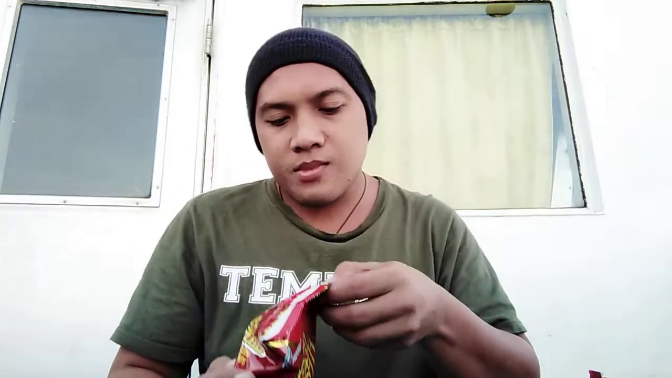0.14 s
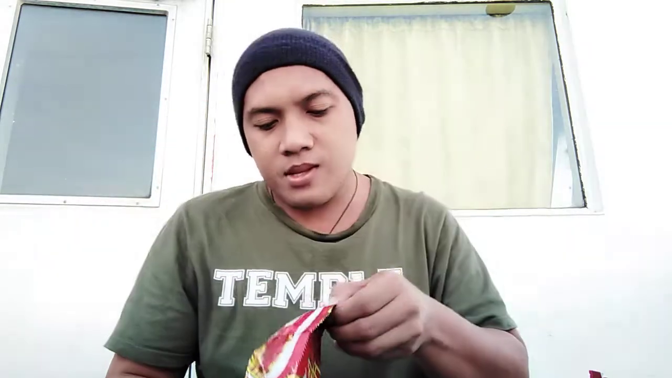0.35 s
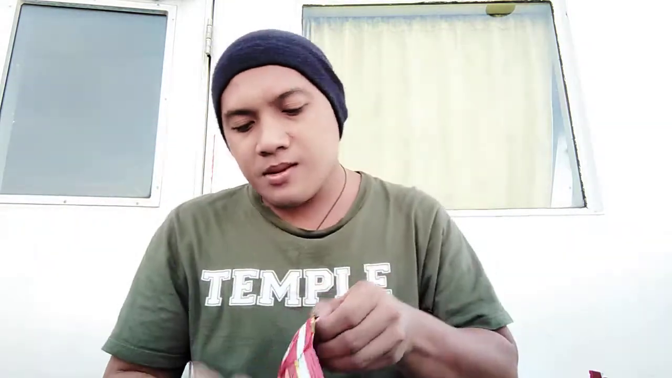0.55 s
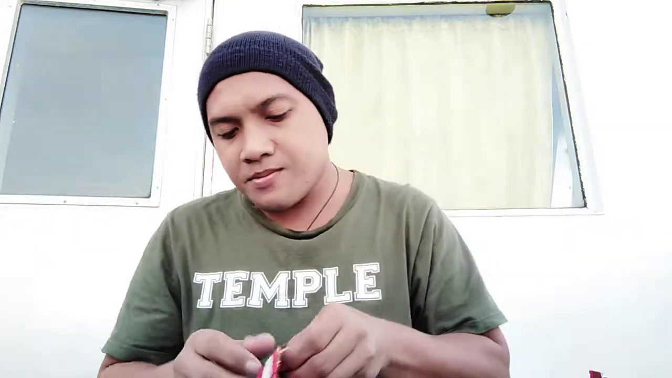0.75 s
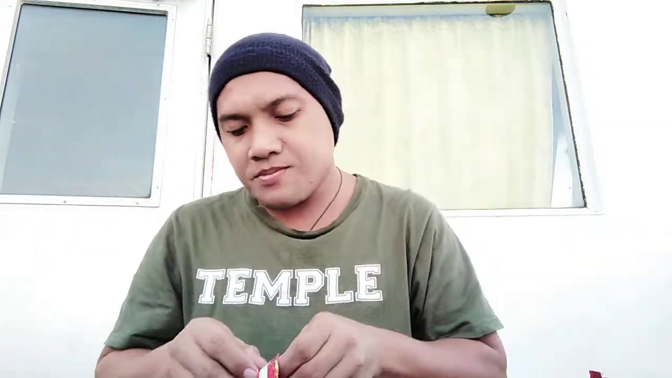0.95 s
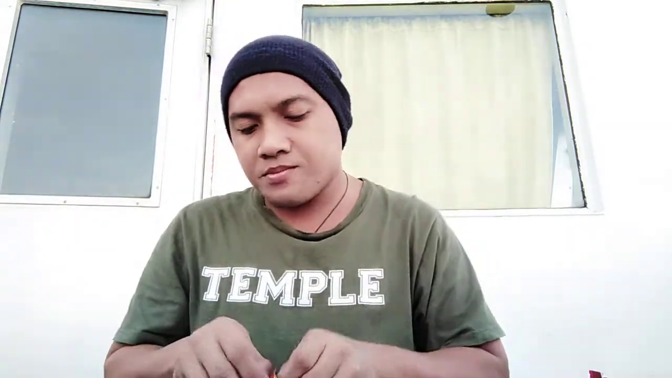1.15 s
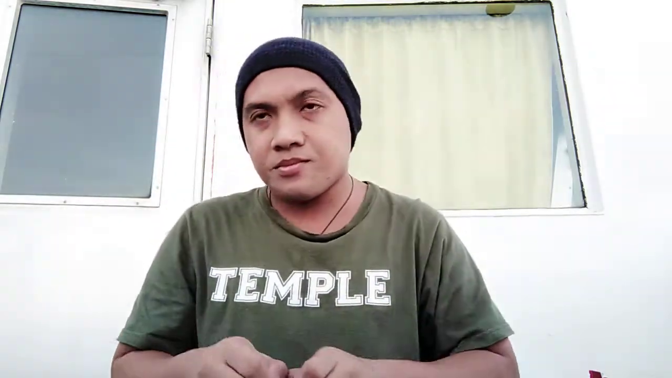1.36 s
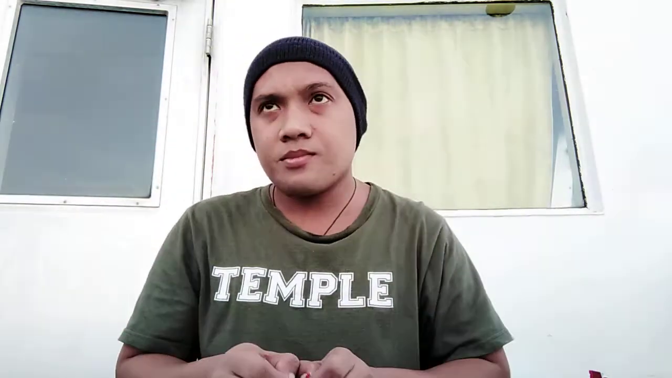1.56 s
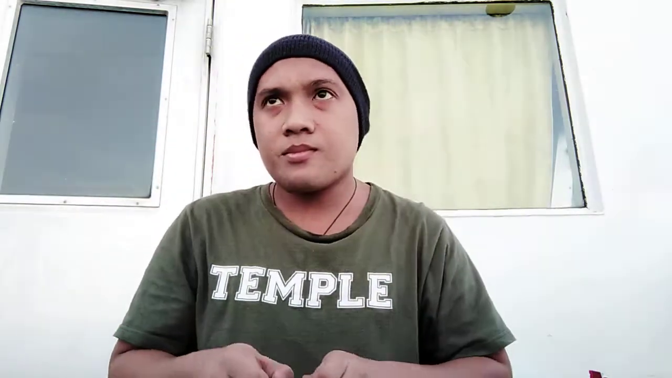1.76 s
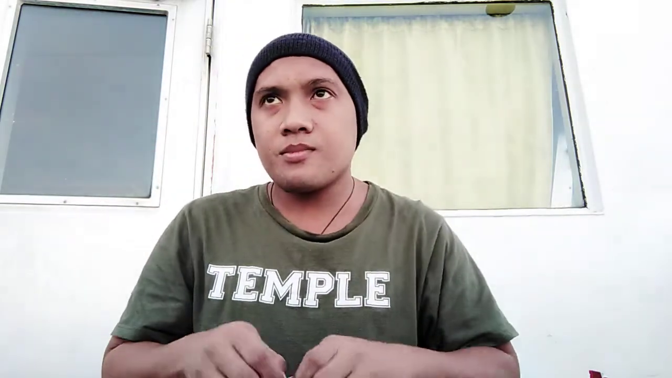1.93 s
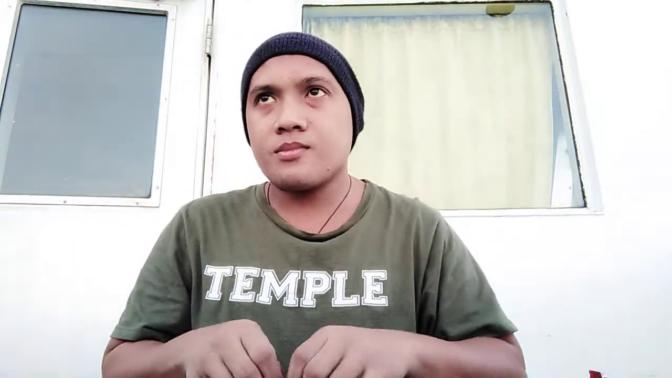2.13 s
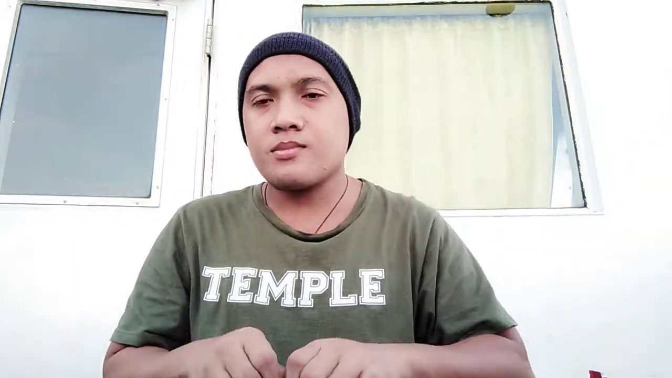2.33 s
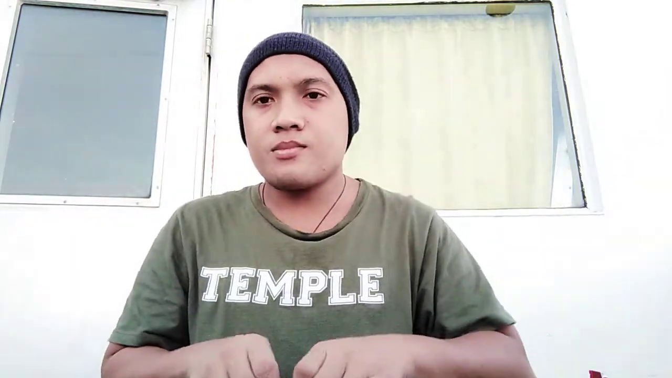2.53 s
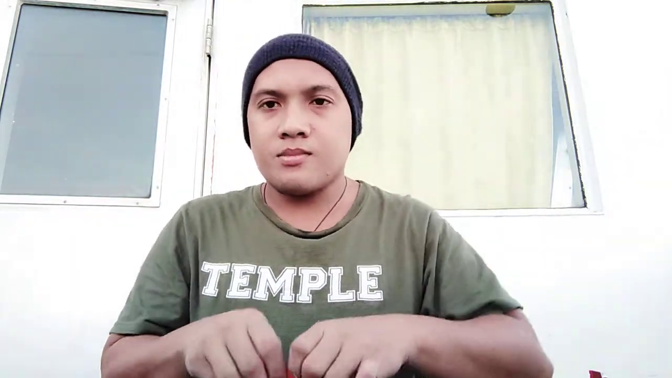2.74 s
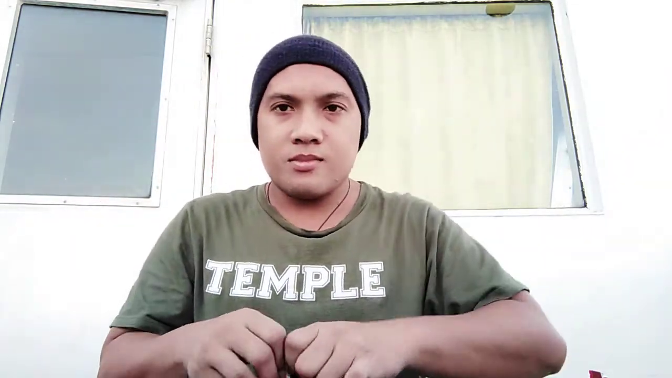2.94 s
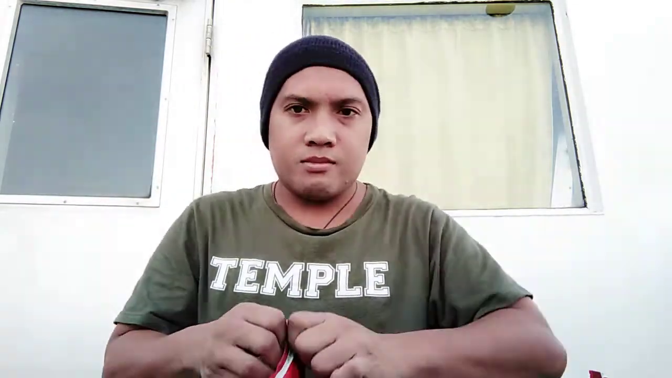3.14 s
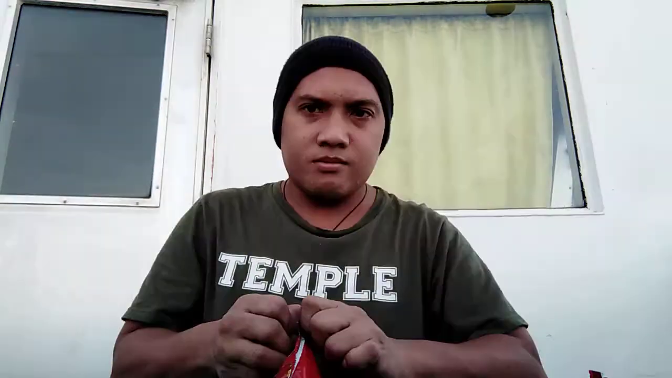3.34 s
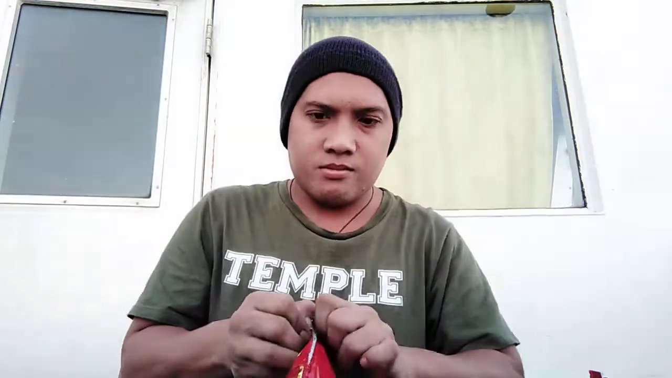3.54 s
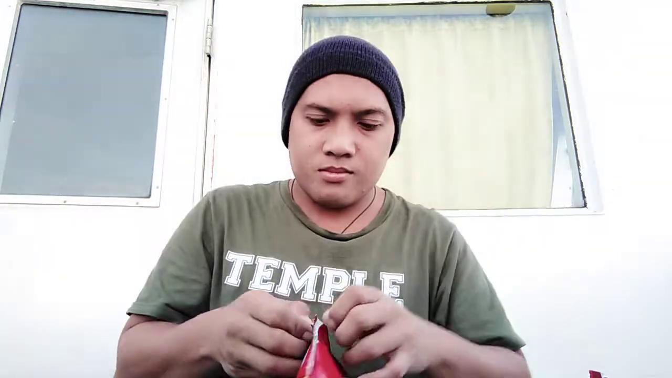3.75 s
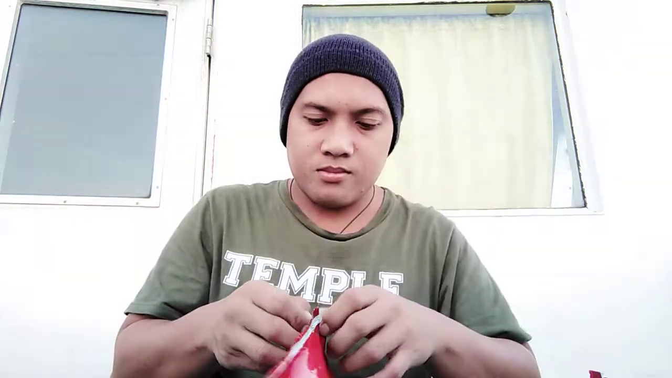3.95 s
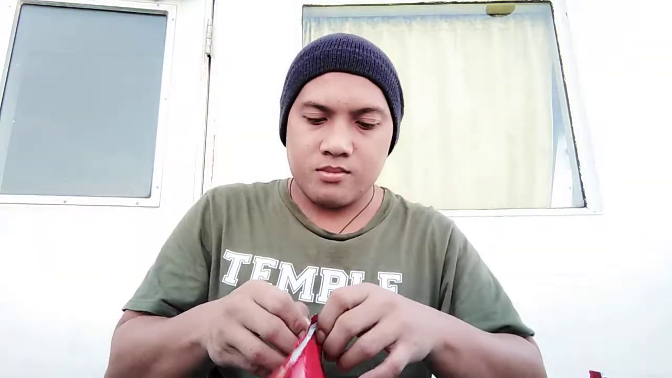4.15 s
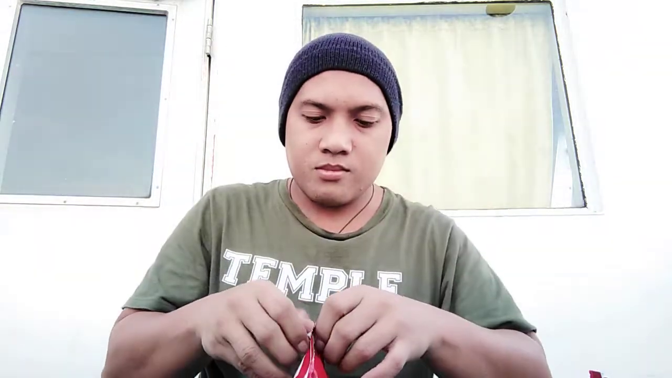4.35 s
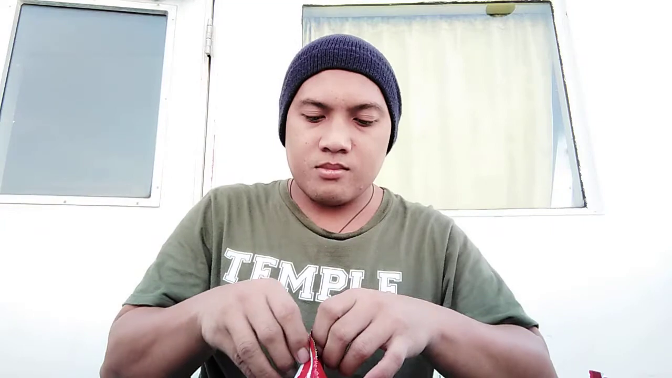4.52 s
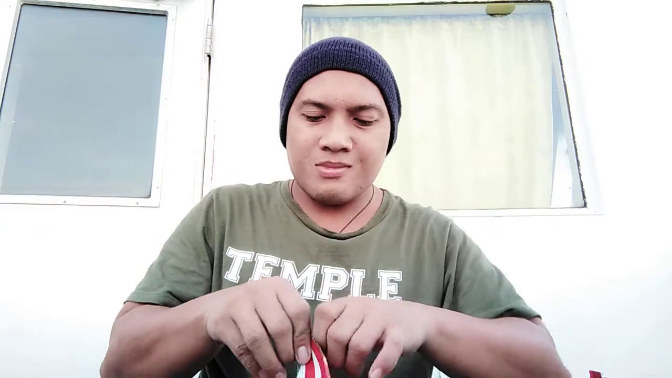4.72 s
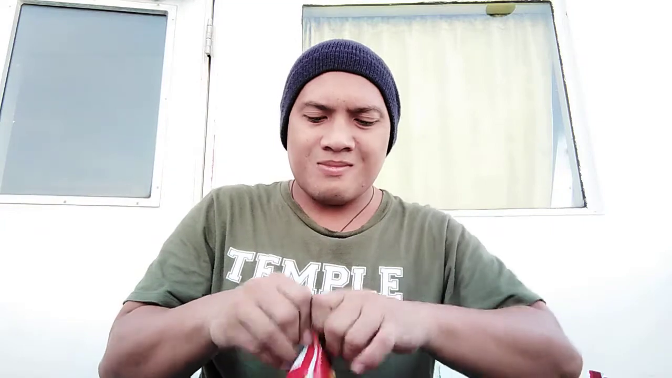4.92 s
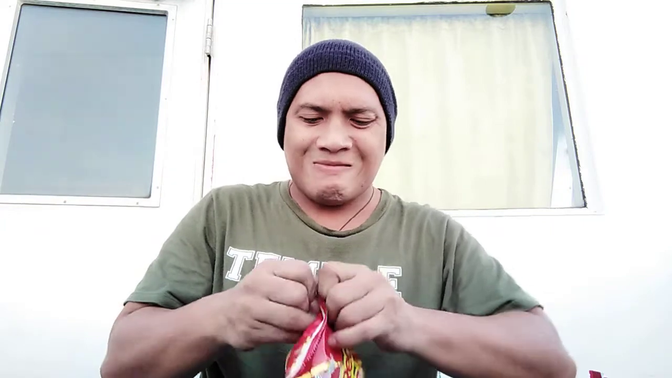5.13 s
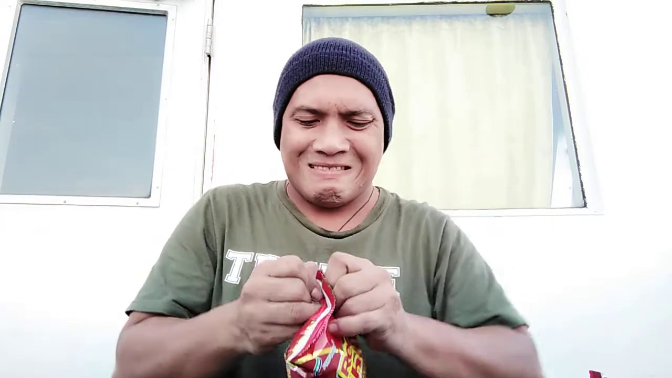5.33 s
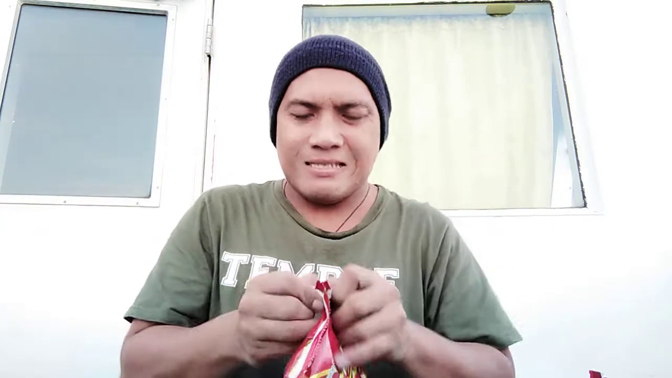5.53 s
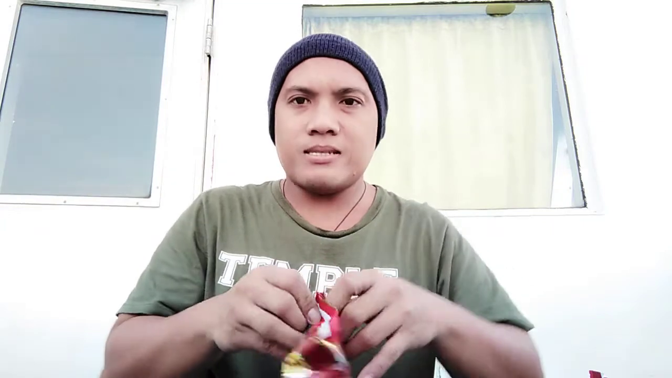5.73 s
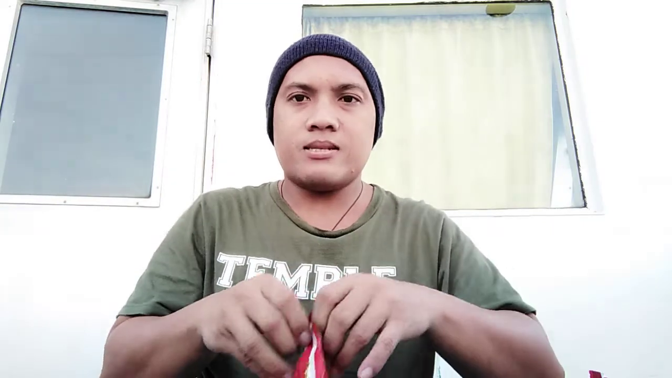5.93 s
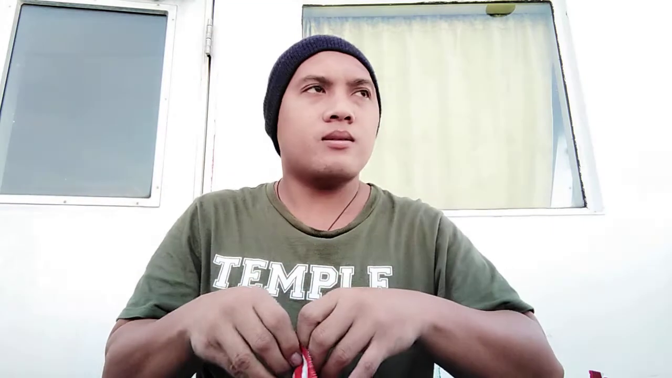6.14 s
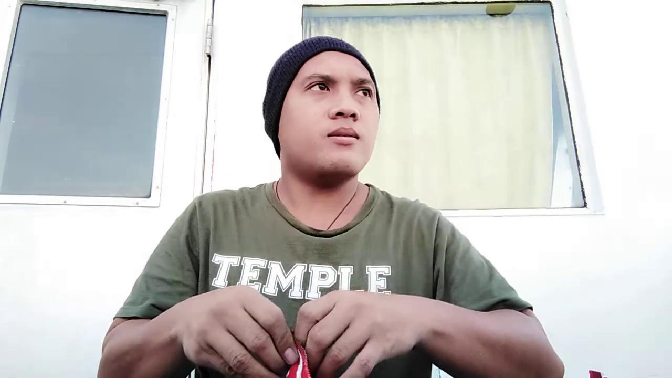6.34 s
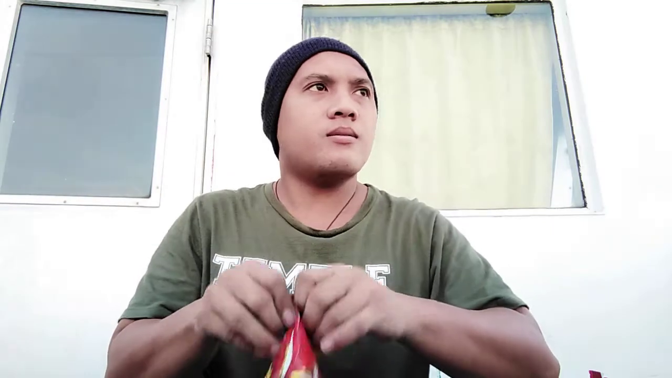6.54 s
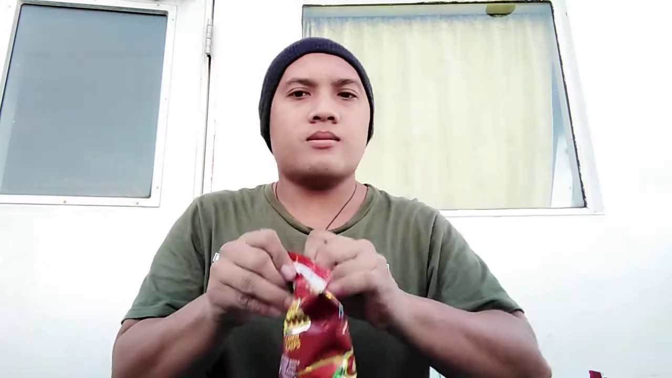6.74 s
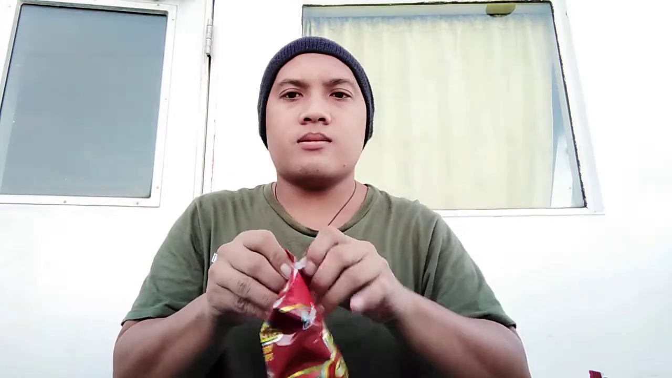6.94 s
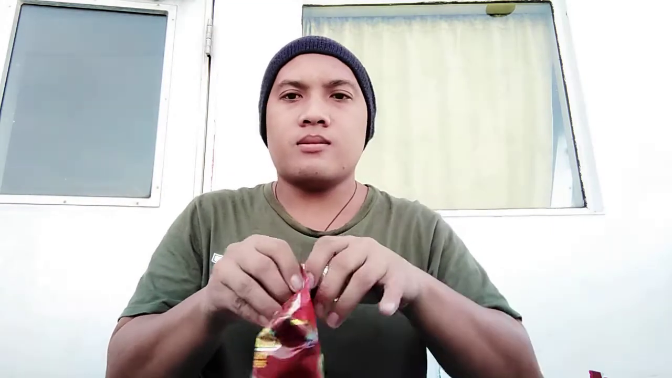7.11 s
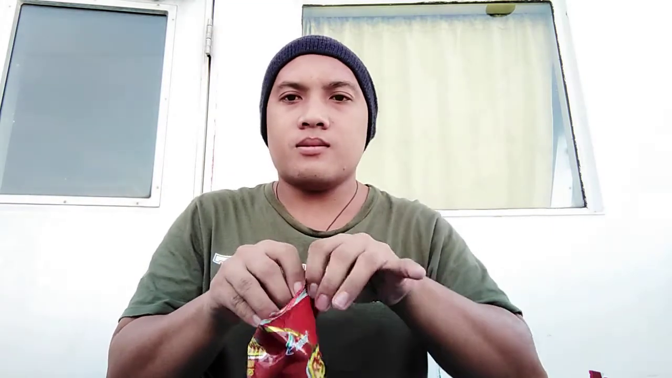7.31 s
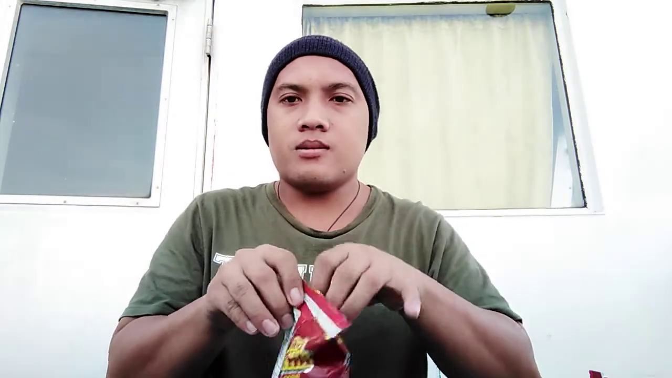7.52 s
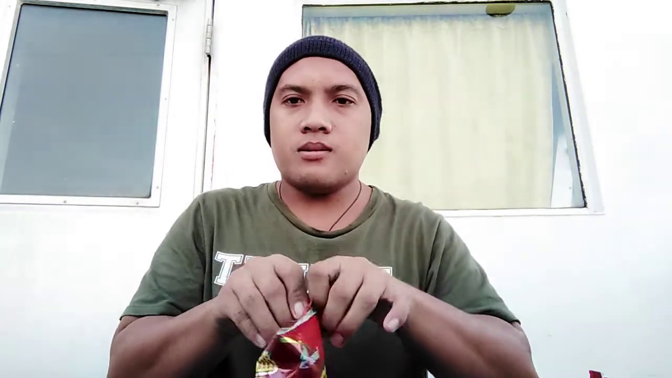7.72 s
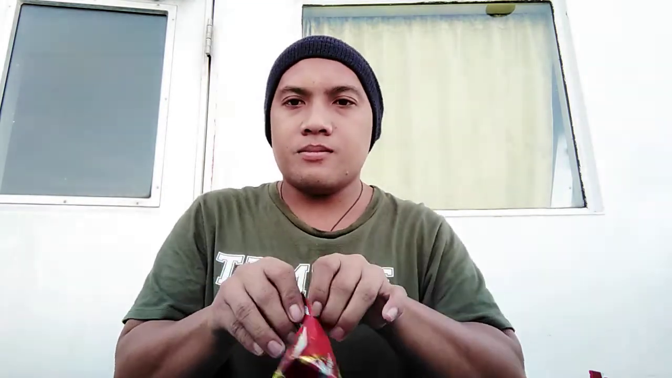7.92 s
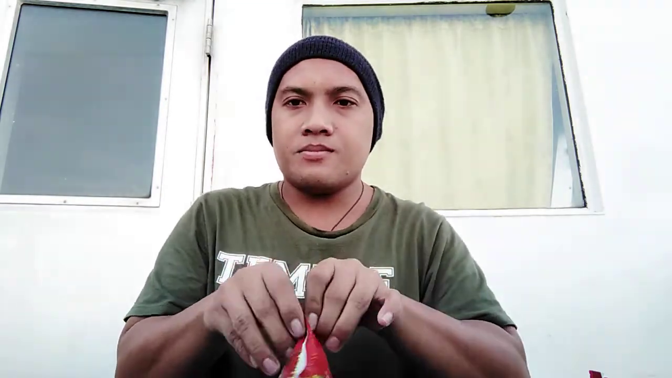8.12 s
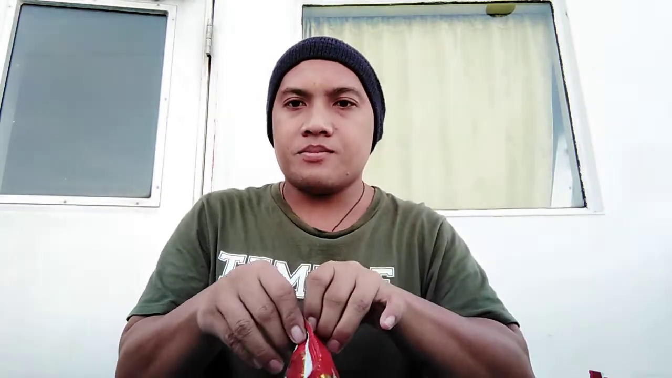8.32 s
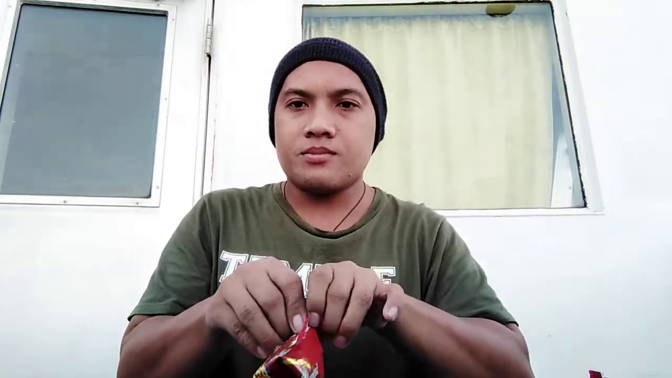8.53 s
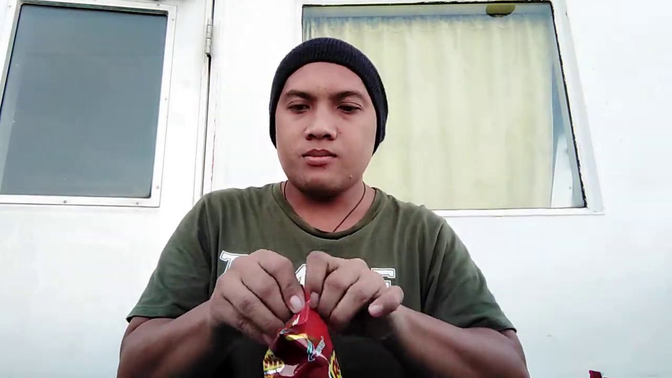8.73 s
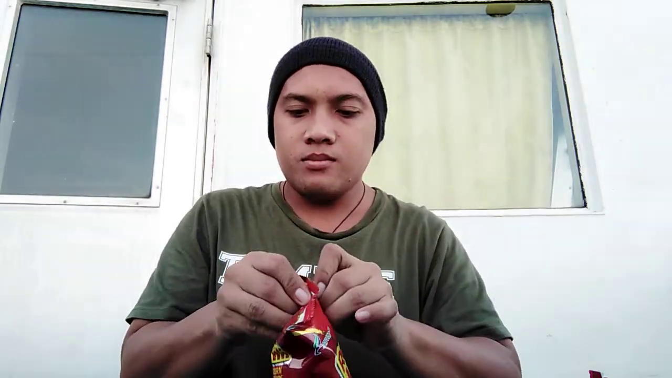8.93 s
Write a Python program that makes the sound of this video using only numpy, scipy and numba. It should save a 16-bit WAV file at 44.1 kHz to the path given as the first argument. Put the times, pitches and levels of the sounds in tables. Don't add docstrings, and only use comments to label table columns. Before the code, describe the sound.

Hands twist and pinch a small foil snack bag, sharp irregular crackles and snaps close up, a hard pull midway, faint low hum behind.

```python
import sys
import numpy as np
from scipy import signal
from scipy.fft import rfft, irfft
from scipy.io import wavfile
from numba import njit

SR = 44100
rng = np.random.default_rng(int(sys.argv[2]) if len(sys.argv) > 2 else 0)


def generate_wav(signal):
    frames = np.transpose(np.atleast_2d(signal))
    scaled = np.clip(frames, -1, 1) * 32767
    pcm = np.round(scaled).astype(np.int16)
    wavfile.write(sys.argv[1], SR, pcm)


def voltage_ratio(level):
    return 10 ** (np.asarray(level, float) / 20)


N = 395577
PORT_LAG = 20

# frequency in Hz, gain in dB.
FILM = [(2200, -41), (3000, -5), (4500, -6.5), (6000, -4), (8000, -1.5), (10000, -2), (12000, -6),
        (14000, -5.5)]
# frequency in Hz, gain in dB.
PANEL = [(450, -42.5), (800, -19.5), (1230, -19), (1550, -2), (1900, -8.5), (2300, -2.5), (3000, -9.5),
         (3800, -12.5)]
# frequency in Hz, gain in dB.
BAG = [(120, -32.5), (230, -4), (300, 0.5), (450, -6), (580, 4.5), (680, 4), (790, 14), (1000, 15),
       (1300, -19.5), (1800, -66.5)]


def on_log(table, hz):
    table = np.array(table)
    return np.interp(np.log(hz + 1), np.log(table[:, 0]), table[:, 1])


def colour(x, table):
    log_gain = on_log(table, np.linspace(0, SR / 2, 2049)) * np.log(10) / 20
    cepstrum = irfft(log_gain)
    cepstrum[1:2048] *= 2
    cepstrum[2049:] = 0
    taps = irfft(np.exp(rfft(cepstrum)))[None, :2048]
    return signal.fftconvolve(x, taps / np.sqrt(np.sum(taps ** 2)), axes=1)[:, :N]


@njit
def rings(start, hz, t60, size):
    out = np.zeros(N)
    for k in range(len(start)):
        turn = np.exp(2j * np.pi * hz[k] / SR - np.log(1000) / (t60[k] * SR))
        z = size[k] + 0j
        for i in range(start[k], min(N, start[k] + int(t60[k] * SR))):
            out[i] += z.imag
            z *= turn
    return out


def clusters(s, gains, spread_s, fall_db, scatter_db, lo_hz, hi_hz, cycles, sideways, count):
    wall_ring = .4
    chance = rng.random((len(s), 7, count))
    first = np.arange(count) == 0
    late = spread_s * chance[:, 0] ** 2 * ~first
    place = np.where(first, .5 + 0.037 * chance[:, 4], chance[:, 4])
    hz = lo_hz * (hi_hz / lo_hz) ** place
    t60 = cycles * np.where(first, .4, .5 + chance[:, 6]) / hz
    side = np.clip(np.round(4 * chance[:, 5] - 1.8), -1, 1)
    lag = sideways * PORT_LAG * side / 2 * ~first
    out = np.zeros((3, N))
    for c, way in enumerate((1, -1, 0)):
        scatter = scatter_db * (chance[:, 1 + c] - .5)
        db = (fall_db * (0.22 + late / spread_s) + scatter) * ~first
        start = np.clip((s[:, None] + late) * SR + lag * way, 0, N - 1).astype(np.int64)
        length = t60 * (1 if way else wall_ring)
        size = gains[c][:, None] * voltage_ratio(db)
        out[c] = rings(start.ravel(), hz.ravel(), length.ravel(), size.ravel())
    return out


def both_sides(a, b, loose, lag):
    return np.array([np.roll(a, lag) + b, a + np.roll(b, lag)]) + loose


def hum():
    # frequency in Hz, level in dB per Hz.
    spectrum = [(25, -19.5), (45, -28.5), (67, 6), (88, -15.5), (108, 3.5), (140, -15.5), (165, -8.5),
                (178, 2.5), (195, -5.5), (230, -1), (320, -11), (420, -30.5), (580, -14.5), (750, -63),
                (14000, -77.5)]
    # time in seconds, level in dB.
    deep_level = [
        (0.0, -65),
        (7.52, -68),
        (8.97, -78),
    ]
    # frequency in Hz, left minus right in dB.
    tilt = [(110, -0.5), (200, 14), (400, 18), (800, 9)]
    hz = np.linspace(0, SR / 2, N // 2 + 1)
    right, left, *loose = rng.standard_normal((4, N))
    tilt_db = on_log(tilt, hz) / 2
    pair = rfft(both_sides(right, 0.65 * left, 0.29 * np.array(loose), PORT_LAG))
    pair = pair * voltage_ratio(on_log(spectrum, hz) + np.array([tilt_db, -tilt_db]))
    deep = irfft(pair * (hz < 135), N)
    rest = irfft(pair * (hz >= 135), N)
    swell_db = np.interp(np.arange(N) / SR, *np.transpose(deep_level))
    wander = np.interp(np.arange(N), np.linspace(0, N, 45), rng.standard_normal(45))
    mix = deep * voltage_ratio(swell_db + 13.0) + rest * voltage_ratio(-52.0 + 2.5 * wander)
    return mix / np.sqrt(np.mean(deep ** 2))


def crackle():
    # time in seconds, effort in dB,
    # squeeze in dB (how much the whole bag moves beyond the fingertips).
    hands = [(0,-67.5,4.5),(.52,-60,7.5),(1.97,-53.5,0),(2.42,-75,-4),(2.67,-43,-18.5),(3.169,-69,21),(3.6,-74,10),(3.999,-67.5,-43),(4.989,-62,12),(5.2,-43,16.5),(5.32,-39.5,-2.5),(5.72,-45.5,8),(6.07,-64,-2.5),(7.638,-55,-3),(7.89,-66,-4),(8.97,-48.5,-6.5)]
    s, effort_db, squeeze_db = np.transpose(hands)
    panel_db = effort_db + 0.92 * squeeze_db
    bag_db = effort_db + squeeze_db
    chance = rng.random((5000, 2))
    at = chance[:, 0] * N / SR
    size_db = -5 * np.log(.04 + chance[:, 1])
    soft = BAG[:6] + BAG[8:]
    out = 0
    for db, table, trim_db, uneven in [(effort_db, FILM, 9, .45), (panel_db, PANEL, 0, .6), (bag_db, soft, -14, .3)]:
        gain = voltage_ratio(np.interp(at, s, db) + uneven * size_db + trim_db)
        grains = clusters(at, [gain] * 3, spread_s=.003, fall_db=0, scatter_db=14, lo_hz=table[1][0],
                          hi_hz=table[-2][0], cycles=3.96, sideways=0.85, count=3)
        out = out + colour(grains, table)
    return out


def snaps():
    # time in seconds,
    # level in dB, # panel ring in dB relative to that level, left minus right in dB.
    crease_snaps = [(.0047,-26.5,5.5,1),(0.1364,-36.5,-27,10),(0.1999,-9,-4.5,1.5),(0.2743,-14.5,-4,4),(0.2995,-11.5,-11,4),(.577,-25,3.5,4.5),(0.633,-23,5.5,-2.5),(0.7018,-9.5,-2.5,-4),(0.82,-11,-6.5,-10.5),(0.8319,-24,10.5,13.5),(0.915,-21,-13,7.5),(1.008,-29,5,3),(1.0645,-30.5,4,10.5),(1.1112,-26.5,7,-4),(1.182,-34,7,4),(1.2811,-8.5,-4.5,1),(1.27,-30,-18,9),(1.4015,-29.5,15,8),(1.4222,-18,10.5,-5),(1.444,-13.5,6.5,-6),(1.5146,-8,3.5,-4.5),(1.529,-18,1.5,18.5),(1.722,-40,14,-17),(1.7975,-22.5,-3,-21),(1.9404,-11.5,-8,3.5),(1.9815,-11.5,-3.5,-2.5),(2.1162,-14,-2.5,11.5),(2.131,-20.5,-6,20),(2.277,-41,-33,10),
                    (2.5103,-26.5,2,-14.5),(2.567,-26,11,-15.5),(2.6025,-11.5,-1.5,9.5),(2.636,-6.5,-2.5,7.5),(2.649,-29,-18,-4),(2.669,-17.5,1,10.5),(2.7384,-37.5,18,4),(2.7577,-14,-9,-0.5),(2.8073,-14.5,-3.5,1.5),(2.8649,-24.5,-3,5.5),(2.931,-42,-24,20),(3.12,-19,1,1),(3.144,-2.5,-14.5,-6),(3.156,-4,-24,4),(3.2599,-9.5,-2,0),(3.2686,-16.5,0.5,8),(3.3813,-5,-11.5,5.5),(3.477,-16.5,-0.5,-1.5),(3.4961,-7,-21,5.5),(3.58,-10.5,-6.5,1),(3.6664,-20.5,5.5,-3),(3.693,-28.5,6,-18.5),(3.7218,-14.5,1.5,5.5),(3.754,-18.5,-5.5,-15.5),(3.986,-45.5,-11,4),(4.134,-32,10.5,-3.5),(4.299,-12,-2,4),(4.444,-8,-6.5,-0.5),(4.671,-7,-8,-5.5),(4.7318,-8.5,-5.5,3.5),(4.773,-9.5,-14,5),(4.935,-18,5,4.5),
                    (5.0339,-5,-15.5,-3),(5.038,-15.5,4,10),(5.0813,-24,9.5,12),(5.1103,-16,10,-1),(5.131,-11,-17,-9),(5.1608,5,-7,-5.5),(5.166,-20.5,-5,4),(5.18,-1,-24,-1),(5.2229,-9.5,1.5,7),(5.2448,-11.5,8.5,0.5),(5.2572,-9,5,1),(5.2978,-12.5,-4,-4),(5.32,-4,-6.5,1.5),(5.3455,2,-8.5,0.5),(5.376,-4,-5,-1),(5.386,-1.5,-5,1),(5.397,-10,5,-4),(5.41,-3.5,0,-5.5),(5.461,-19,-15,2),(5.465,-4,-3.5,8.5),(5.502,-15.5,4,2),(5.5118,-11,-13,0),(5.5707,-10.5,2.5,4),(5.595,-30,-10,14),(5.618,-15,-6,8),(5.643,-5,-2,-2),(5.685,-7,-1.5,4.5),(5.763,-13,-52,14),(5.7934,-14.5,-3,-5),(5.808,-12,-3,3),(5.862,3,-15,-9),(5.871,-13,-33,16),(5.9072,0,-6.5,-2),(5.915,-26,-10,-3),(5.9457,-8,-41,12),
                    (6.0567,-23.5,13.5,-2.5),(6.131,-21,-17,3),(6.1502,-3.5,-9.5,-5),(6.157,-14,-31,-14),(6.2861,-30.5,13.5,-15),(6.319,-13.5,3.5,9),(6.4098,-9,-21,10),(6.4903,-21,0.5,5.5),(6.584,-22.5,-1,-3),(6.655,-30.5,3,4),(6.675,-10,-8.5,6),(6.69,-9,-7,2),(6.734,-8.5,4.5,-2),(6.74,-15,-7,23),(6.789,-3.5,5,5),(6.7995,-2,-27.5,9),(6.847,-12,-4,3.5),(6.982,-20,-1.5,-0.5),(7.0477,-33,-22,9),(7.1527,-29,7.5,9),(7.293,-20.5,-6,9),(7.3024,-5,-18,1),(7.3155,-17,-38,19.5),
                    (7.4,-25,2.5,10),(7.453,-15.5,2.5,2.5),(7.523,-19,-30,8),(7.643,-2.5,-7,0),(7.669,-11,-0.5,3),(7.677,-4,-4,3.5),(7.9384,-16,-4.5,4),(8.045,-22,-12,5),(8.142,-21.5,1.5,0),(8.2238,-26.5,10.5,-4),(8.262,-25,7,-4),(8.3454,-25,-4,5),(8.3769,-22,6.5,8.5),(8.4476,-16.5,-1,-6.5),(8.5134,-45,17,21),(8.526,-5,-16,-5.5),(8.641,-22.5,-9.5,-11),(8.681,-32.5,20,-2),(8.697,-31.5,10.5,16.5),(8.817,-27,0.5,15),(8.822,-23,-3,-6),(8.8288,-16,-8.5,11.5),(8.837,-10,-46,6),(8.879,0,-23,7.5),(8.906,-5,-7,-1.5)]
    # time in seconds, level in dB.
    faint = [(0.0227, -25), (0.0613, -32), (0.371, -24.5), (0.417, -27), (0.558, -29), (0.8096, -19.5),
             (1.881, -37), (2.0766, -27.5), (2.4682, -44), (2.486, -32.5), (2.5457, -15), (2.8962, -23),
             (2.946, -21.5), (3.0217, -28), (3.098, -43), (4.082, -48), (4.404, -32.5), (6.2428, -27.5),
             (6.261, -27), (6.3988, -21), (6.9687, -22.5), (7.243, -19.5), (7.513, -25), (7.803, -29.5),
             (7.8377, -30.5), (7.8903, -30.5), (8.2823, -19), (8.4185, -28), (8.4325, -18), (8.585, -34),
             (0.5016, -32), (0.7898, -43), (1.3235, -27), (1.3538, -42), (2.9543, -40), (3.0694, -37),
             (3.2444, -33), (3.4353, -36), (3.65, -28), (4.923, -35), (6.0282, -28.5), (6.5594, -36),
             (6.936, -36), (7.07, -36), (7.1333, -34), (7.2284, -23), (7.3827, -36), (7.425, -25.5),
             (7.5887, -39), (7.613, -35), (7.693, -15.5), (8.035, -36), (8.205, -24.5), (8.786, -43),
             (8.94, -37)]
    ticks = [(s, db - 8, 8.5, 7.5) for s, db in faint]
    s, db, ring_db, pan_db = np.transpose(crease_snaps + ticks)
    wet_db = -16 + 0.27 * ring_db - 0.0068 * db + 0.61 * abs(pan_db)
    aim = np.array([pan_db / 2, -pan_db / 2, wet_db + 11])
    size = np.clip(2 ** (-(ring_db + 8.5) / 42.5), .5, 1.2)[:, None]
    patch = 2 ** (1.1 * rng.random((len(s), 1)) - .3)
    creak = clusters(s - .004, voltage_ratio(db + aim - 37), spread_s=0.003, fall_db=12, scatter_db=10,
                     lo_hz=3000, hi_hz=12000, cycles=9.0, sideways=0.61, count=5)
    crack = clusters(s, voltage_ratio(db + aim - 2.0), spread_s=0.0025, fall_db=-12.5, scatter_db=3.3,
                     lo_hz=4200 * size, hi_hz=14500 * size, cycles=7.0, sideways=0.93, count=9)
    after = clusters(s + 0.0019, voltage_ratio(db + wet_db + 0.78 * aim + 4.0), spread_s=0.04, fall_db=-24.0, scatter_db=20,
                     lo_hz=3383 * size, hi_hz=14000 * size, cycles=18.1, sideways=0.75, count=26)
    ring = clusters(s, voltage_ratio(db + ring_db + 0.66 * aim - 12.0), spread_s=.025, fall_db=-5.5, scatter_db=18.9,
                    lo_hz=546 * patch, hi_hz=3460 * patch, cycles=8.8, sideways=0.92, count=8)
    return colour(creak + crack + after, FILM) + colour(ring, PANEL)


def panels():
    # time in seconds, level in dB, pitch in Hz.
    panel_rings = [(0.1989, -19, 1770), (0.2736, -18, 2320), (0.2987, -14, 2540), (0.632, -16, 2280),
                   (0.6994, -6.5, 2200), (0.8142, -13, 1410), (1.066, -20, 2300), (1.1106, -19, 2600),
                   (1.2788, -33, 2590), (1.401, -20.5, 2540), (1.4225, -8, 1580), (1.4412, -13, 1530),
                   (1.513, -23, 1830), (1.7204, -26, 2250), (1.798, -32, 1600), (1.8805, -23, 1820),
                   (1.9387, -27, 1610), (1.9794, -21, 1460), (2.0782, -29, 2570), (2.116, -20.5, 1580),
                   (2.488, -33, 1620), (2.5432, -25, 2680), (2.6023, -22, 1410), (2.6336, -9.5, 1440),
                   (2.7577, -15.5, 2680), (2.807, -33, 1620), (2.8957, -20.5, 2130), (2.9455, -25, 1510),
                   (3.1202, -19.5, 1870), (3.246, -26, 1630), (3.26, -17, 2140), (3.3828, -18, 1680),
                   (3.478, -39, 1700), (3.5807, -12.5, 2470), (3.666, -35, 2060), (3.7231, -13, 2440),
                   (3.7535, -19, 2240), (4.135, -35, 1570), (4.2989, -23, 1640), (4.4067, -32.5, 2460),
                   (4.4433, -23, 1780), (4.6708, -48, 2250), (4.7313, -37, 1680), (4.932, -26, 1560),
                   (5.0334, -11.5, 2340), (5.1081, -7, 2550), (5.1293, -16, 2300), (5.154, -13, 2490),
                   (5.2414, -21, 2140), (5.2973, -11, 1450), (5.344, -27, 1480), (5.3959, -14, 2240),
                   (5.4079, -12.5, 2060), (5.4613, -14, 2460), (5.5027, -15, 2040), (5.57, -27, 2160),
                   (5.6402, -16.5, 1800), (5.6833, -18, 2310), (5.795, -24, 2170), (5.8588, -15, 2170),
                   (5.8938, -15.5, 2250), (5.9072, -25, 2320), (6.055, -28, 2520), (6.1492, -24, 1620),
                   (6.2873, -25.5, 1550), (6.3962, -26, 1610), (6.491, -24, 1650), (6.582, -25, 2380),
                   (6.6496, -26, 1520), (6.6753, -16, 2280), (6.7402, -11, 2500), (6.7907, -11.5, 1380),
                   (6.9693, -28, 2160), (7.227, -25, 2420), (7.2995, -15.5, 2350), (7.3992, -23, 2400),
                   (7.4526, -15, 2210), (7.5228, -15.5, 2180), (7.6253, -33, 1560), (7.6425, -11.5, 2120),
                   (7.676, -24, 1630), (7.9397, -19, 2300), (8.0459, -28.5, 1620), (8.1402, -18.5, 2280),
                   (8.227, -14, 1640), (8.284, -18, 2350), (8.513, -19.5, 2340), (8.5824, -21, 2230),
                   (8.6811, -14, 2200), (8.8214, -19, 2170), (8.893, -26, 2660), (8.9069, -12.5, 2190)]
    s, db, hz = np.transpose(panel_rings)
    hz = hz[:, None]
    return clusters(s, voltage_ratio([db - 10.5, db - 9.5, db - 22.5]), spread_s=.012, fall_db=-10, scatter_db=33.0,
                    lo_hz=hz * 0.914, hi_hz=hz * 1.125, cycles=33, sideways=1, count=5)


def slides():
    # start in seconds,
    # length in seconds, level in dB, centre in Hz.
    shifts = [(0.305, 0.13, -44.5, 315), (0.559, 0.13, -44.5, 208), (0.659, 0.071, -36, 287),
              (1.741, .06, -52, 195), (2.382, 0.18, -40, 183), (3.15, 0.096, -38, 336),
              (3.332, .2, -46.5, 306), (3.858, 0.11, -42.5, 182.5), (3.94, 0.099, -69, 1306),
              (4.297, 0.061, -48.5, 578), (4.679, 0.086, -50, 812), (4.922, .09, -42, 887),
              (4.639, 0.14, -44.5, 228), (5.121, .1, -35.5, 178), (5.679, 0.13, -50, 229),
              (7.2, 0.12, -55, 404), (7.278, 0.097, -32.5, 334), (7.451, 0.11, -49, 304),
              (8.242, 0.09, -48, 354)]
    width_hz = 28
    out = np.zeros(N)
    for s, length_s, db, hz in shifts:
        swell = np.hanning(int(length_s * SR))
        noise = rng.standard_normal(SR // 2)
        noise = signal.lfilter(*signal.iirpeak(hz, hz / width_hz, SR), noise)
        noise = signal.lfilter(*signal.iirpeak(hz, hz / width_hz / 2, SR), noise)[-len(swell):]
        out[int(s * SR):][:len(swell)] += voltage_ratio(db) * swell * noise / np.std(noise)
    return out * voltage_ratio([[-1.5], [1.5], [-16]])


def pops():
    # time in seconds, level in dB, pitch in Hz.
    bag_pops = [(.702,-16.5,805),(.814,-12.5,363),(.815,-17,700),(1.445,-5.5,368),(1.512,-7.5,483),(1.978,-12,362),(2.545,-19.5,222),(2.603,-11.5,370),(2.632,-5.5,390),(2.896,-18,305),(3.118,-22.5,342),(3.264,-10,310),(3.38,-20,770),(3.58,-21,906),(3.72,-23,885),(4.444,-24,580),
                (5.084,-15,470),(5.121,-1.5,265),(5.152,-18,585),(5.176,-16,590),(5.219,-4,350),(5.298,-8,405),(5.345,-5,390),(5.407,-9.5,615),(5.501,-21,740),(5.682,-13.5,697),(6.412,-27,530),(6.675,-19,1170),(6.74,-19,392),(6.791,-13,545),(6.981,-23,470),(7.301,-15.5,317),(7.459,-15.5,314),(7.515,-19,330),(7.666,-23.5,770),(8.227,-18,402),(8.679,-22,690),(8.906,-24.5,990)]
    s, db, hz = np.transpose(bag_pops)
    tone = rings((s * SR).astype(np.int64), hz, 8 / hz, voltage_ratio(db - 9.0))
    knock = clusters(s, voltage_ratio([db - 15.5] * 3), spread_s=0.01508, fall_db=-1.3, scatter_db=2.7,
                     lo_hz=266, hi_hz=2800, cycles=1.73, sideways=0, count=6)
    return colour(tone + knock, BAG) * voltage_ratio([[0], [0], [-11]])


def room(x):
    # centre in Hz, 60 dB decay in seconds, level in dB.
    bands = [(342, 0.39, 7), (840, 0.24, 8), (1800, 0.28, 1), (5330, 0.14, 5), (8700, 0.15, -2),
             (12200, 0.16, -2)]
    # frequency in Hz, 60 dB decay in seconds, level in dB.
    modes = [(580, .2, -13), (790, .12, -21)]
    wall_s, wall_db = 0.01, -5
    t = np.arange(SR // 2) / SR
    centres = np.array(bands)[:, 0]
    edges = np.sqrt(centres[1:] * centres[:-1])
    tail = 0
    for (hz, t60, db), lo, hi in zip(bands, np.r_[60, edges], np.r_[edges, 16000]):
        right, left, ahead, *loose = rng.standard_normal((5, len(t)))
        even = min((560 / lo) ** 2, 2) * ahead + min(hz / 7000, 1) * np.array(loose)
        noise = both_sides(right, .9 * left, even, PORT_LAG)
        band = signal.sosfilt(signal.butter(2, [lo, hi], "band", fs=SR, output="sos"), noise)
        shape = voltage_ratio(-60 * t / t60) * np.clip(t / 0.0019, 0, 1)
        tail = tail + voltage_ratio(db) * band * shape / np.sqrt(2 * np.sum(shape ** 2))
    for hz, t60, db in modes:
        mode = np.sin(2 * np.pi * hz * t) * voltage_ratio(-60 * t / t60)
        tail = tail + voltage_ratio(db) * mode / np.sqrt(np.sum(mode ** 2))
    tail[0, int(wall_s * SR) + PORT_LAG] += voltage_ratio(wall_db)
    tail[1, int(wall_s * SR)] += voltage_ratio(wall_db)
    return signal.fftconvolve(x[None], tail, axes=1)[:, :N]


def ports(x):
    # pitch in Hz, width in Hz, level in dB.
    whistles = [
        (8700, 1400, 12.5),
        (7450, 900, 10),
    ]
    out = []
    for heard, (hz, width_hz, db) in zip(x, whistles):
        whistle = signal.lfilter(*signal.iirpeak(hz, hz / width_hz, SR), heard)
        out.append(heard + voltage_ratio(db) * whistle)
    return np.array(out)


def scene():
    bag = crackle() + snaps() + panels() + slides() + pops()
    bag = signal.sosfilt(signal.butter(2, 110, "high", fs=SR, output="sos"), bag)
    return ports(bag[:2] + room(bag[2])) + hum()


def roll_off(x):
    return signal.sosfilt(signal.butter(12, 15610, fs=SR, output="sos"), x)


def record(dry):
    dull = signal.sosfilt(signal.ellip(8, .2, 60, 14300, fs=SR, output="sos"), dry)
    clipped = np.tanh(dull / 1.48).clip(-.7, .7)
    return roll_off(clipped * 1.203)


dry = scene()
out = record(dry)
generate_wav(out)
```